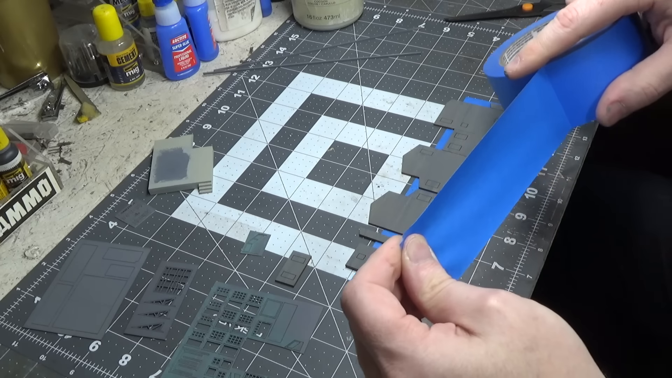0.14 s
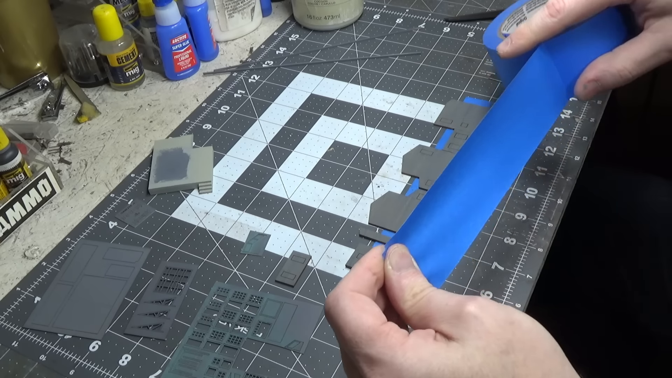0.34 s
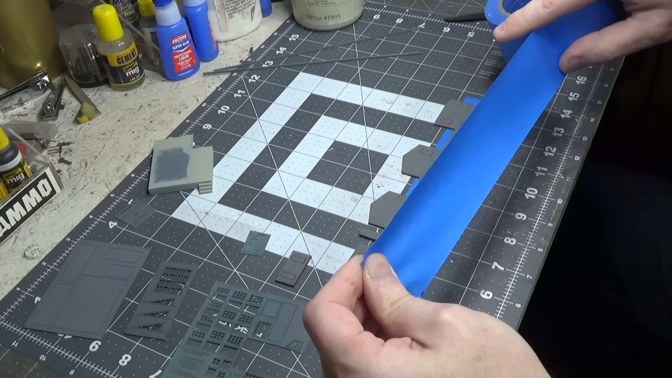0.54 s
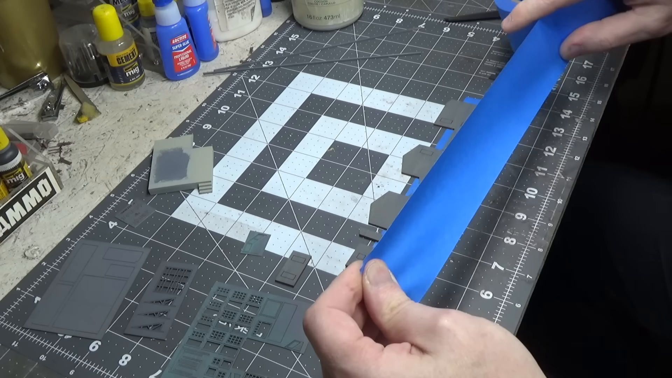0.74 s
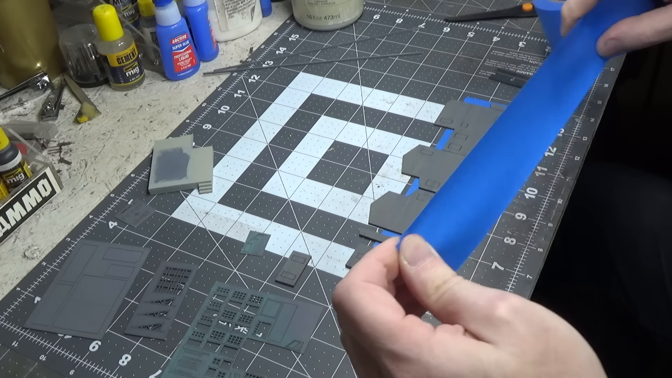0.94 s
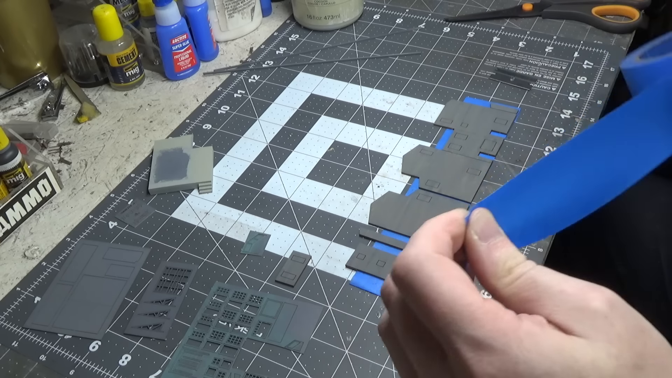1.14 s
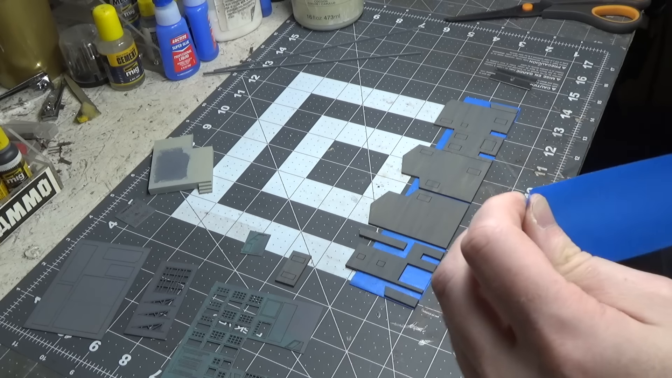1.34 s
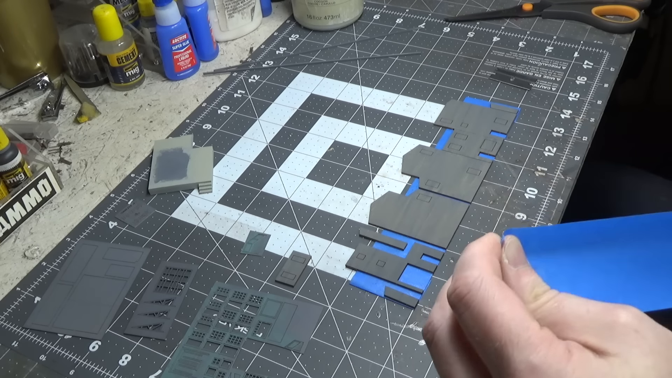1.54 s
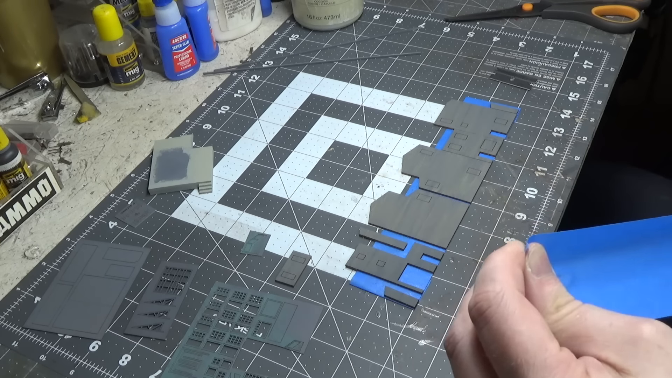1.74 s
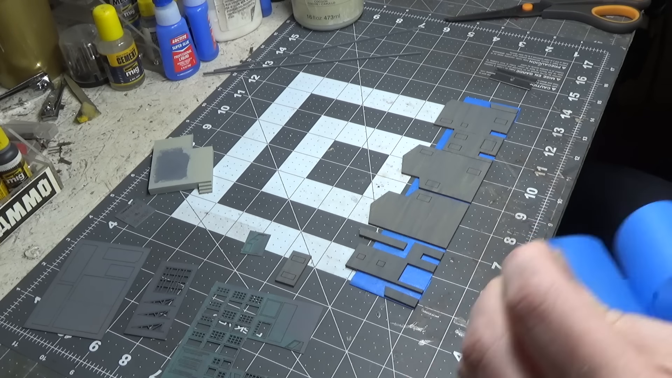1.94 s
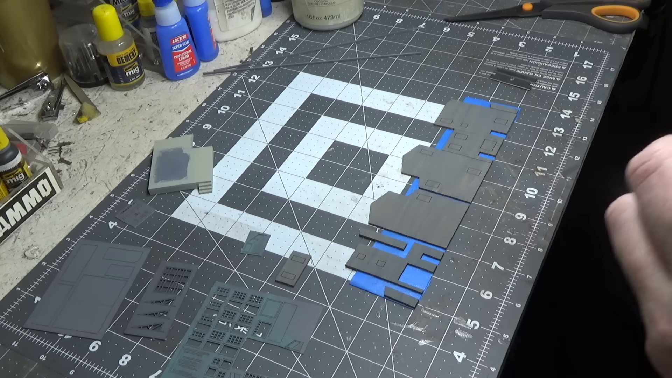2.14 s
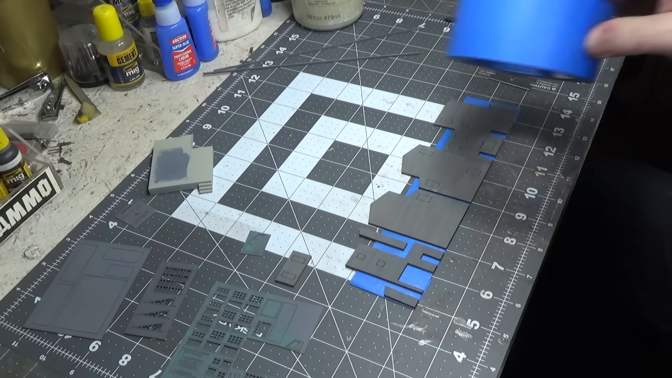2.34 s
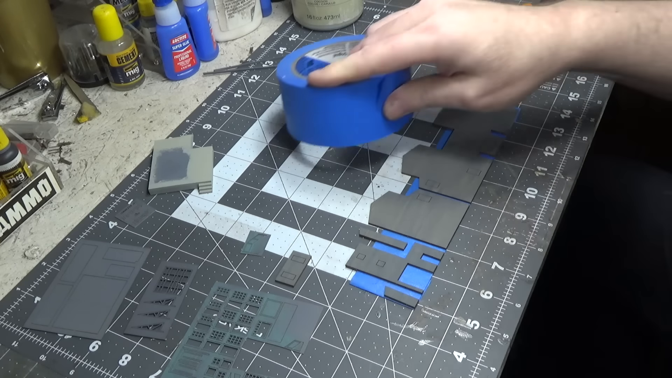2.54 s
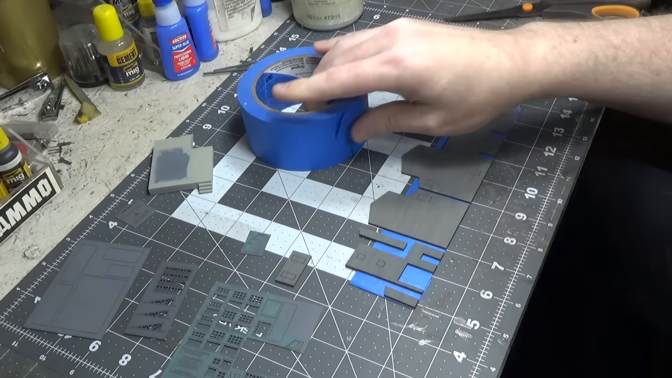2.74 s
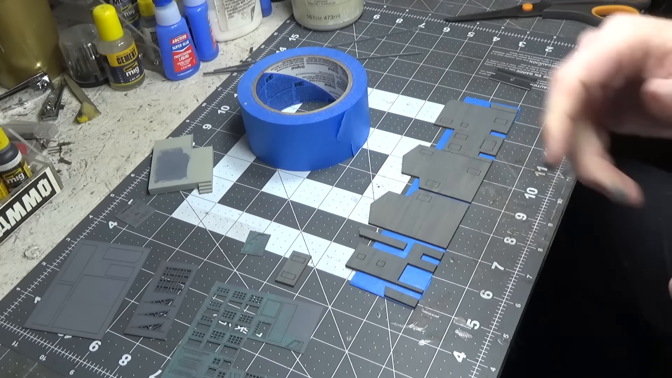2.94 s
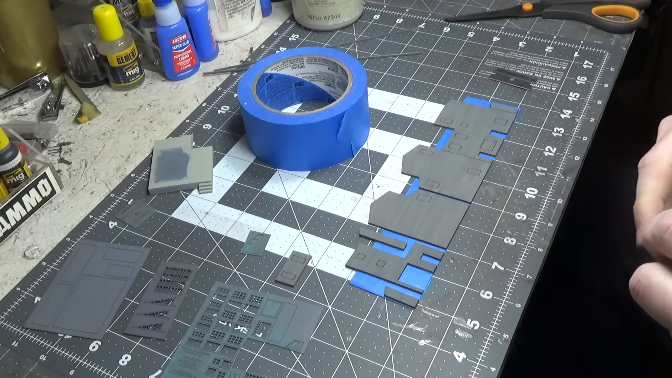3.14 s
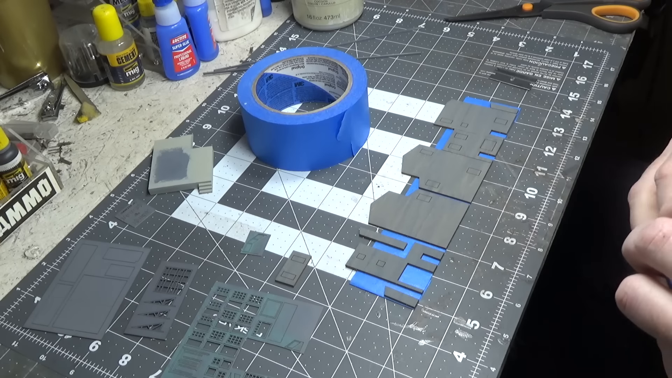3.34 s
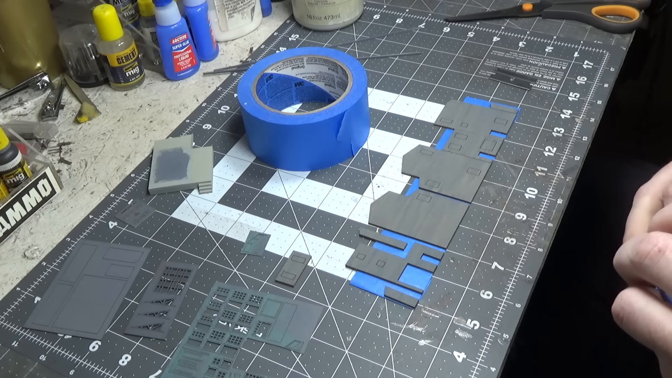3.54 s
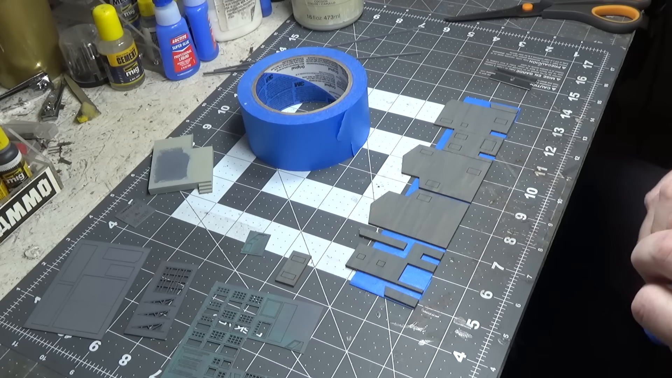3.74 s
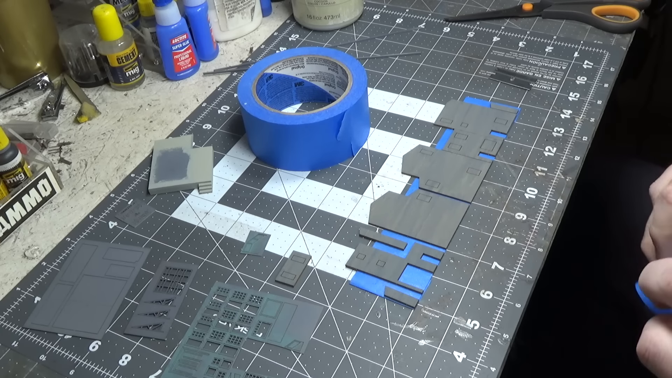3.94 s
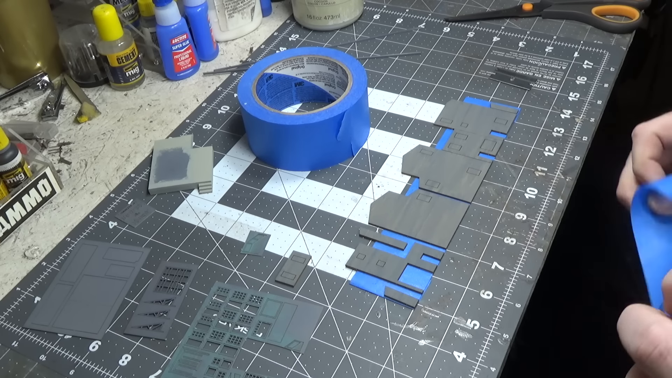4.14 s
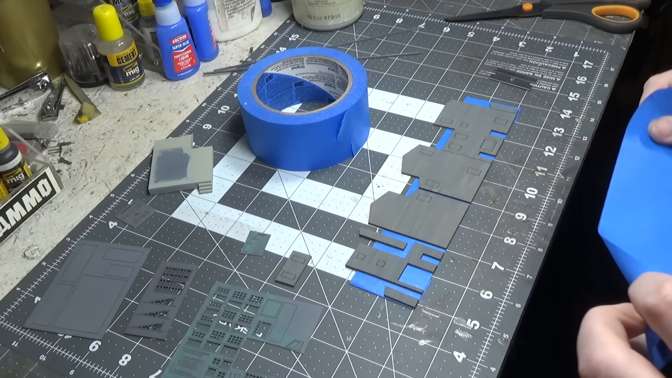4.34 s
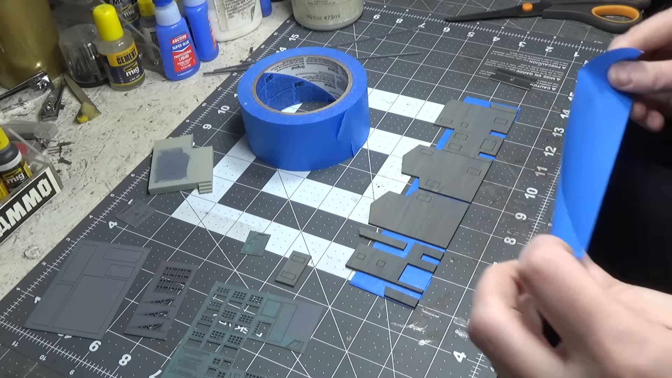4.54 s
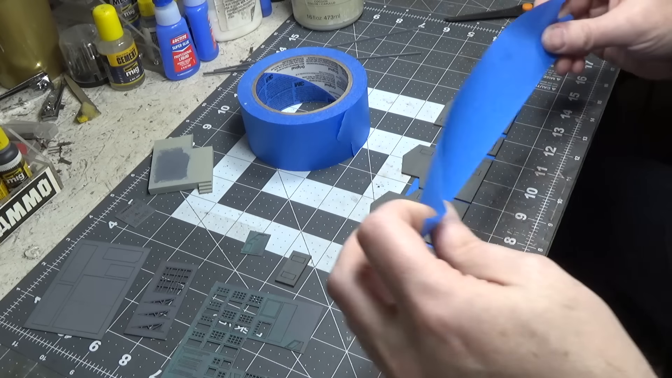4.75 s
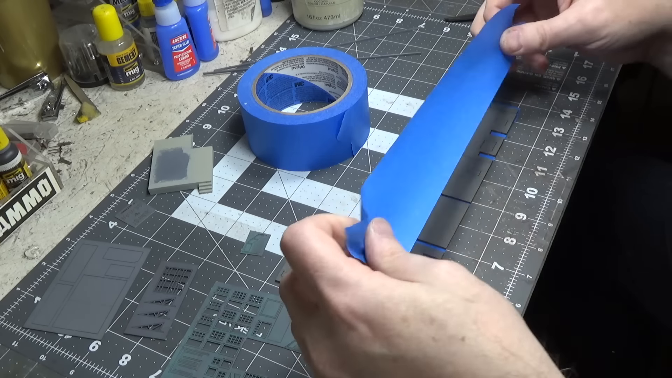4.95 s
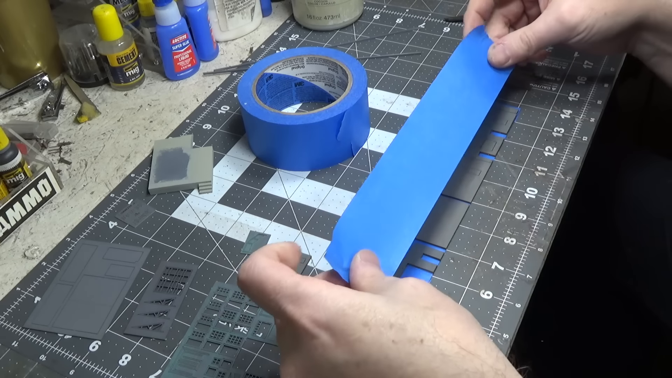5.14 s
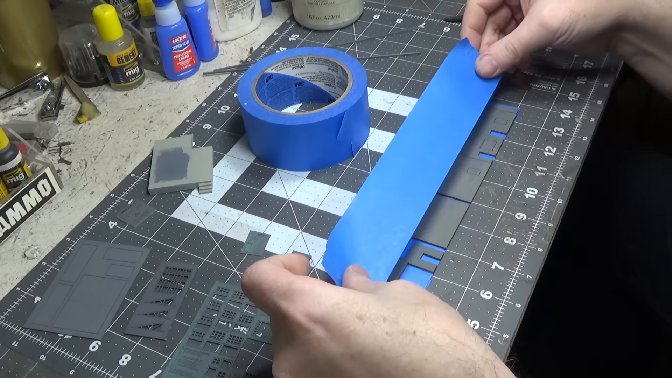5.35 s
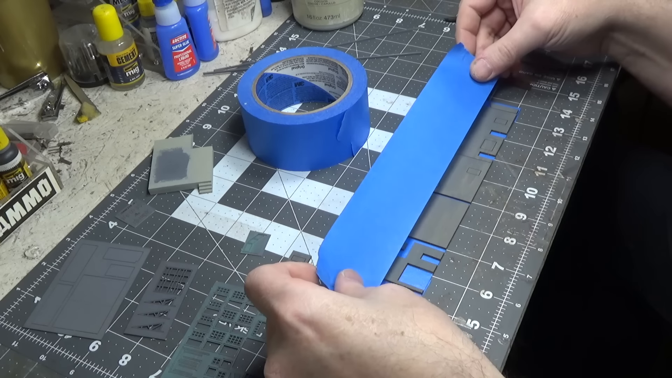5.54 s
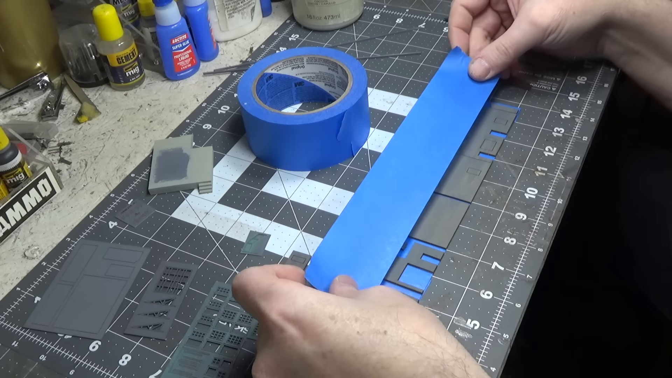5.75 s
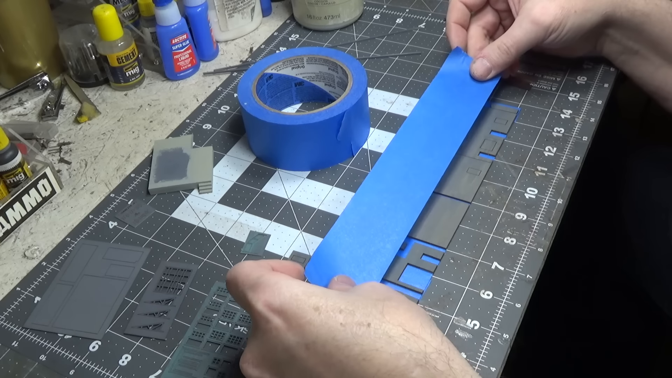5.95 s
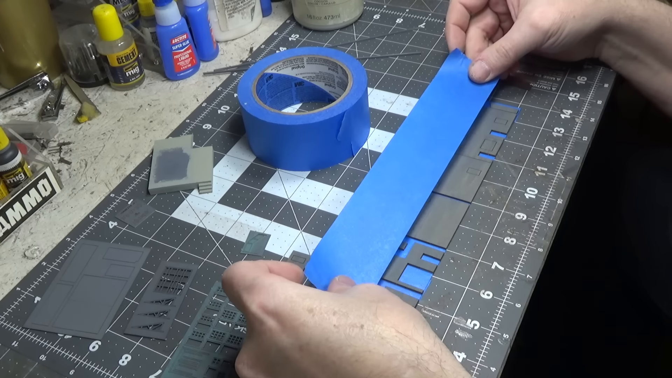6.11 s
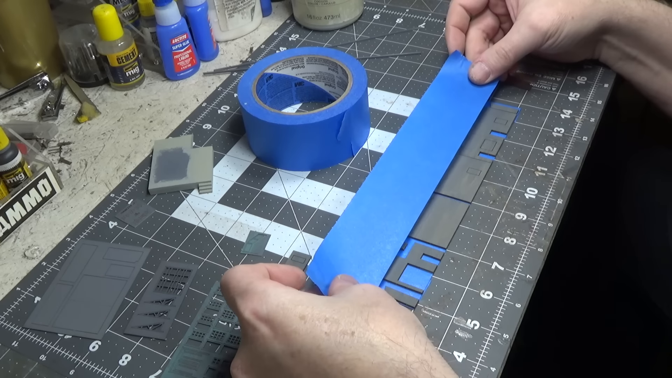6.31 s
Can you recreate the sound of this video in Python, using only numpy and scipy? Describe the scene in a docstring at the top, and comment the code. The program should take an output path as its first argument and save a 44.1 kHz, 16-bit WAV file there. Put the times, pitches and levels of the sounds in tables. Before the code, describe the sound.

Close crackling pull of masking tape, one sharp tear, a booming knock on a desk, then light papery crinkles and snaps.

```python
"""Pulling and tearing painter's tape

Tape is pulled off its roll close to a microphone: the glue crackles and the growing strip drones ever
lower. One rip, loud enough to distort, tears it off. The roll is set down on a desk, which booms and
sways. The loose strip rustles, buckles and snaps between the fingers, in a small quiet room."""
import sys
import numpy as np
from scipy import signal
from scipy.fft import rfft, irfft, next_fast_len
from scipy.io import wavfile
from scipy.ndimage import map_coordinates

SR = 44100
rng = np.random.default_rng(int(sys.argv[2]) if len(sys.argv) > 2 else 0)


def to_wav(sig):
    """Store sig (one row per channel, or 1-D mono) as 16-bit WAV at the path in sys.argv[1].

    Samples outside -1..1 are clipped; the rate is SR.
    """
    pcm = np.clip(np.atleast_2d(sig), -1, 1) * 32767
    pcm = np.round(pcm).astype(np.int16)
    wavfile.write(sys.argv[1], SR, pcm.T)  # frames by channels


N = 281269

# The pull on the tape. Each row: time in seconds, strength of the pull in dB, drone level in dB.
PULL_LEVELS = [(0, -42, -36), (.11, -40.5, -33), (.26, -45, -39.5), (.4, -43, -44), (.55, -44, -43.5),
               (.63, -45.5, -50), (.81, -50.5, -44.5), (.92, -70, -67.5)]
# The lowest note of the growing strip. Each row: time in seconds, pitch in Hz.
STRIP_PITCH = [(0, 253), (.18, 238.5), (.3, 194), (.48, 169.8), (.6, 132), (.72, 122.5), (.85, 111.6),
               (.95, 107.3)]
# The tone of glue letting go. Each row: frequency in Hz, boost or cut in dB.
CRACKLE_TONE = [(60, 3), (150, -15), (450, 7), (1300, 2.5), (2300, 3), (3000, 3), (4100, -7.5), (5500, -6),
                (9000, -17.5), (16000, -23)]
# The tone of the finest glue threads. Each row: frequency in Hz, boost or cut in dB.
FIZZ_TONE = [(1500, -25), (4000, -7), (5300, -1.5), (7000, 1), (9500, 1), (11500, -4.5), (16000, -7.5)]


def peel():
    """Glue threads snap by the thousand and shake the taut strip, whose notes sink as it grows."""
    pull_db, drone_db = curves(PULL_LEVELS)
    strip_hz, = curves(STRIP_PITCH)
    doublings = np.log2(strip_hz[0] / strip_hz)  # how often the strip has doubled in length
    judder = amp(1.3 * wobble(141.1))  # the tape sticks and lets go unevenly
    threads = unit(judder * grains(5000, spread_db=2.5))
    rasp_fade_db = 55 * np.maximum(np.log2(158.5 / strip_hz), 0)  # 55 dB an octave below 158.5 Hz
    rasp_db = pull_db + 1.5 + 0.93 * wobble(22.6) - rasp_fade_db
    # The short strip sounds dull and noisy; the long one rings like a string.
    ringing = np.interp(strip_hz, [115, 165, 230], [.85, .4, .3])
    waver = amp(2.7 * wobble(19.2))
    string_hz = strip_hz * (1 + 0.026 * wobble(32))
    string = np.sqrt(2) * waver * np.sin(2 * np.pi * np.cumsum(string_hz) / SR)
    tugs = coloured(grains(3000, spread_db=5), [(40, -12), (140, -2.5)])
    dull = gliding(tugs, strip_hz, width_hz=55)
    drone = amp(drone_db) * (np.sqrt(ringing) * string + np.sqrt(1 - ringing) * dull)
    overtone = amp(drone_db - 18) * gliding(threads, 2 * strip_hz, width_hz=120)
    rasp = amp(rasp_db) * gliding(threads, np.minimum(4.56 * strip_hz, 860), width_hz=200)
    crackle = amp(pull_db + 3.5) * unit(coloured(threads, CRACKLE_TONE))
    fine_threads = judder * grains(9000, spread_db=6)
    fizz = amp(pull_db - 8 + 9.5 * doublings) * unit(coloured(fine_threads, FIZZ_TONE))
    return (drone + overtone + rasp + crackle + fizz) * during(PULL_LEVELS[0][0], PULL_LEVELS[-1][0])


# The jerks of the rip. Each row: start in seconds, relative level in dB, bass in dB, treble in dB,
# fade time in seconds.
TEAR_JERKS = [(1.8169, -1.5, -9, -9.5, 0.0033), (1.8222, -7, -1, -5, 0.0066), (1.8306, 1, 1, -1.5, 0.0044),
              (1.8515, 5.5, -7, 0.5, .0016), (1.8647, -11, -1.5, -6, 0.002)]


def tear():
    """The tear crosses the strip in a few violent jerks, and the taut sheet rings."""
    out = np.zeros(N)
    for start, db, bass_db, treble_db, fade_s in TEAR_JERKS:
        add(out, start, amp(db + 16.5) * paper_burst(bass_db, treble_db, fade_s, ring_hz=5397))
    return out


def paper_burst(bass_db, treble_db, fade_s, ring_hz, snap=0, ring_db=-8):
    """Paper fibres crack in a dying run, with an optional first snap; the sheet shapes the tone."""
    t = np.arange(SR // 12) / SR
    age = t / fade_s
    cracks = rng.standard_normal(len(t)) * np.exp(-age) * (1 - np.exp(-age / .35))
    cracks /= np.linalg.norm(cracks)
    cracks[0] += snap * np.exp(-fade_s / 0.0011)  # only the briefest bursts go in one snap
    sheet_tone = [(30, bass_db - 23), (110, bass_db + .5), (450, bass_db + 6), (950, bass_db + 6.5),
                  (1500, bass_db / 3 + 2), (2700, 1), (4200, treble_db / 4 - 4),
                  (5600, treble_db / 2 + .5), (9000, treble_db + 1.5), (12000, treble_db - 8),
                  (16000, treble_db - 15)]
    burst = coloured(cracks, sheet_tone)
    burst += amp(ring_db) * signal.lfilter(*signal.iirpeak(ring_hz, 3.5, SR), burst)
    return burst / np.linalg.norm(burst)


# The roll lands on its rim, then flat. Each row: start in seconds, relative level in dB,
# boost or cut of the clack in dB.
ROLL_LANDINGS = [(2.639, -22.5, -7), (2.7766, -6.5, -10.5)]
# The desk top's notes. Each row: pitch in Hz, relative level in dB, seconds to fade by 60 dB.
DESK_NOTES = [(82, 2, 0.16), (139.5, -4.5, 0.19), (186.3, -9.5, 0.136), (295.5, -20, 0.13), (402, -8, .13),
              (490, -12.5, 0.12), (535, -13, 0.17), (1002, -15, 0.1), (1160, -20, .15), (1450, -27, 0.13)]
# The desk's two slow swings. Each row: frequency in Hz, relative level in dB, seconds to fade by 60 dB.
DESK_SWINGS = [(34.39, 1, 1.42), (41.17, -1.5, 2.3)]
# The tone of the cardboard core. Each row: frequency in Hz, boost or cut in dB.
CLACK_TONE = [(25, -38), (60, -7), (130, 15), (450, 7.5), (750, -3), (1300, 0.5), (1800, -2.5), (2400, 7.5),
              (3200, -4.5), (4300, -18.5), (8000, -22.5), (16000, -43)]


def roll_on_desk():
    """The cardboard core clacks, the desk top booms, and the whole desk sways on."""
    out, t = np.zeros(N), np.arange(2 * SR) / SR
    for start, db, clack_db in ROLL_LANDINGS:
        boom = sum(ring(t, *note) for note in DESK_NOTES) * (1 - np.exp(-t / 0.0011))
        fade = (amp(-60 * t / 0.018) + amp(-18 - 60 * t / 0.16)) * (1 - np.exp(-t / 0.0005))
        clack = unit(coloured(rng.standard_normal(len(t)), CLACK_TONE)) * fade
        add(out, start, amp(db - 9) * boom + amp(db + clack_db + 8) * clack)
    # The roll's full weight starts both swings, which throb against each other.
    start, db, _ = ROLL_LANDINGS[-1]
    sway = (ring(t, *DESK_SWINGS[0]) - ring(t, *DESK_SWINGS[1])) * (1 - np.exp(-t / 0.067))
    add(out, start + 0.0363, amp(db - 22.5) * sway)
    return out


# The strip buckles and snaps. Each row: time in seconds, relative level in dB, bass in dB,
# treble in dB, fade time in seconds.
CREASE_POPS = [(1.0492, -44, 6.5, -23, 0.00049), (1.1224, -40.5, -3, 2, 0.0006),
               (1.2467, -47, -16, 1.5, 0.001), (1.2596, -47, -2, -9, 0.0041),
               (1.3871, -48.5, 4.5, -21, 0.0021), (1.441, -36, -16, -12, 0.0008),
               (1.541, -45, 4.5, -16, 0.0025), (1.6194, -34, 3.5, -20, 0.0015),
               (1.642, -43.5, 8, -24, 0.00046), (1.9278, -38, -5, -34, 0.00062),
               (1.9644, -34.5, 0, -41, 0.00024), (2.0081, -33.5, -3, 2.5, 0.0016),
               (2.1532, -32, -12, -3.5, 0.0015), (2.2891, -50.5, 5, -3, 0.0017),
               (2.3284, -44.5, -2.5, -1, 0.0005), (2.35, -47, 3.5, -5.5, 0.0007),
               (3.274, -48.5, -19, -6.5, 0.0012), (3.3454, -38.5, -23, 4, 0.0013),
               (3.3568, -37, -20, -1, 0.0014), (3.462, -46.5, -14, -23, 0.002),
               (3.536, -36, -2, -30, 0.0055), (3.549, -37.5, -3, -10, 0.002),
               (3.782, -45, 5.5, -5, 0.00091), (3.8774, -45, -16, 3, 0.0015), (4.103, -30.5, -18, 2, 0.002),
               (4.1059, -28.5, -12, -3.5, 0.0031), (4.127, -33, -11.5, -15, 0.0045),
               (4.4097, -35, 1, 17, 0.0052), (4.6174, -28.5, -3.5, 7.5, 0.00055),
               (4.6621, -31.5, -4, -5.5, 0.0035), (4.812, -26.5, -13.5, -8, 0.0011),
               (4.96, -35.5, -7, -14, 0.00054), (4.976, -36.5, -1, -35, 0.0019),
               (5.0896, -32.5, -8.5, -2, 0.001), (5.1627, -36, -14, -14, 0.00046),
               (5.182, -42.5, 7, -14, 0.00044), (5.4652, -25, -21, -14.5, 0.00044)]
# Broad creases have more bass and ring lower. Each row: bass in dB, pitch in Hz.
CREASE_PITCH = [(-20, 3040), (-4.5, 2900), (7.5, 940)]


def pops():
    """Creases strain briefly, then flip over; broad ones are dull, tight ones bright."""
    out = np.zeros(N)
    for start, db, bass_db, treble_db, fade_s in CREASE_POPS:
        ring_hz = np.interp(bass_db, *np.transpose(CREASE_PITCH))
        flip = paper_burst(bass_db, treble_db, fade_s, ring_hz, snap=.7, ring_db=-2.5)
        add(out, start, amp(db + 26.5) * flip)
        strain = paper_burst(bass_db, treble_db, .003, ring_hz)[::-1]  # backwards, so the cracks build
        strain_share = min(fade_s / .001, 1)  # quick flips strain less
        add(out, start - len(strain) / SR, amp(db + 9.5) * strain_share * strain)
    return out


# Fingers slide on the paper. Each row: start and end in seconds, relative level in dB,
# boost or cut of the hiss in dB, boost or cut of the crinkle in dB.
FINGER_STROKES = [(0.968, 1.025, -56, 4.5, 8), (1.104, 1.18, -52.5, 3, -6.5), (1.438, 1.548, -57, -5.5, -6),
                  (1.788, 1.822, -46.5, -4.5, 2.5), (1.91, 2.075, -57.5, -1.5, -16),
                  (2.08, 2.162, -46.5, 3, -11), (2.194, 2.279, -51.5, 4, -12), (2.402, 2.556, -63, 5, 4.5),
                  (2.69, 2.715, -49, -17, -9), (3.192, 3.331, -52.5, -2, 11), (3.33, 3.386, -49.5, -9, -3),
                  (3.426, 3.522, -54, -8, -4), (3.532, 3.552, -39, -11, 3), (3.741, 3.811, -44.5, -1.5, 10),
                  (3.812, 4.042, -53.5, -2, 0), (4.056, 4.461, -49.5, 1.5, -18),
                  (4.092, 4.2, -50, -11, -14), (4.37, 4.455, -53, -3, -6), (4.577, 4.68, -55, 2, -19),
                  (4.731, 5.096, -53, -5, -0.5), (5.139, 5.178, -47, -16, 9),
                  (5.388, 5.459, -67, 0.5, -3.5), (5.551, 5.602, -58.5, -9, -9),
                  (5.761, 5.849, -60, -12.5, -11)]
# The strip stirs faintly while it is held. Each row: start and end in seconds.
HOLDING_TIMES = [(.965, 1.55), (1.9, 2.55), (3.19, 5.2)]
# The tones of rubbing skin, fine hiss and tiny creases. Each row: frequency in Hz, boost or cut in dB.
RUB_TONE = [(80, -11.5), (300, -10), (700, -6), (1300, -2.5), (2200, 0), (3000, 3.5), (4200, -10),
            (6000, -8), (10000, -21), (16000, -40)]
HISS_TONE = [(1500, -23.5), (4000, -7.5), (5500, -2.5), (7000, -4), (9000, 0), (11000, -12), (16000, -16.5)]
CRINKLE_TONE = [(100, -20.5), (400, -4), (1400, -5.5), (2200, 2), (3000, -10.5), (4200, -9.5), (6000, -7.5),
                (10000, -9), (16000, -20)]


def rustle():
    """Skin drags over crepe paper with a rub and a hiss; the strip crinkles where it bends."""
    rub_gain, hiss_gain, crinkle_gain = np.zeros((3, N))
    t = np.arange(SR) / SR
    for start, end, db, hiss_db, crinkle_db in FINGER_STROKES:
        length = end - start
        grip = 1 - np.exp(-t / .004)
        release_s = 0.011 + .06 * length  # long strokes also end slowly
        lift = np.exp(-np.maximum(t - length, 0) / release_s)
        stroke = amp(db - 3 * t) * grip * lift  # the finger eases off by 3 dB a second
        stroke /= np.hypot(1, amp(crinkle_db))  # crinkling takes its share of the stroke
        add(rub_gain, start, stroke)
        add(hiss_gain, start, amp(hiss_db) * stroke)
        add(crinkle_gain, start, amp(crinkle_db) * stroke)
    held = sum(during(start, end) for start, end in HOLDING_TIMES) * amp(2 * wobble(14))
    rub_gain = np.hypot(rub_gain, amp(-66) * held)
    crinkle_gain = np.hypot(crinkle_gain, amp(-63.5) * held)
    drag = amp(1.8 * wobble(45))
    rub = rub_gain * unit(coloured(drag * grains(7000, spread_db=7.5), RUB_TONE))
    hiss = amp(1.5) * hiss_gain * unit(coloured(drag * grains(11000, spread_db=5.5), HISS_TONE))
    clumps = amp(4 * np.tanh(wobble(70)))
    crinkle = amp(3) * crinkle_gain * unit(coloured(clumps * grains(550, spread_db=8), CRINKLE_TONE))
    return rub + hiss + crinkle


# The strip flaps. Each row: start in seconds, relative level in dB, speed (1 is the slack strip).
STRIP_FLAPS = [(1.831, -10.5, 1.84), (1.835, -22, 0.98), (4.123, -41.5, 0.83), (4.616, -39, 1.03),
               (4.665, -40, 1), (4.812, -36.5, 0.84), (4.846, -41, 0.78), (4.964, -34.5, 1)]
# The slack strip's swings. Each row: frequency in Hz, relative level in dB, seconds to fade by 60 dB.
SLACK_SWINGS = [(51.7, 4, 0.098), (81, -3.5, 0.31), (117, 0, 0.12), (168, -3, 0.023), (250, -4.5, 0.18)]


def flaps():
    """Each flap pushes the air in a low, short swing, higher while the strip is taut."""
    out, t = np.zeros(N), np.arange(SR // 3) / SR
    for start, db, speed in STRIP_FLAPS:
        swing = sum((-1) ** k * ring(speed * t, hz * rng.normal(1, 0.046), level, fade_s)
                    for k, (hz, level, fade_s) in enumerate(SLACK_SWINGS))
        add(out, start, amp(db - 2.5) * swing * (1 - np.exp(-t / .002)))
    return out


# How long the room rings. Each row: frequency in Hz, seconds to fade by 60 dB.
ECHO_TIMES = [(100, 0.55), (600, 0.25), (3000, 0.24), (6000, 0.2), (10000, .22), (14000, 0.11)]


def room_echo(x, desk_db, desk_fade_s, walls_db, count=48):
    """Adds echoes: the cluttered desk answers at once, the walls later; paths change as hands move."""
    hz, t, spectra = signal.stft(rng.standard_normal((count, SR // 3)), SR, nperseg=256)
    fade = amp(-60 * t / along(ECHO_TIMES, hz)[:, None])
    walls = signal.istft(spectra * fade, SR, nperseg=256)[1]
    t = np.arange(walls.shape[1]) / SR
    walls *= 1 - np.exp(-t / 0.004)
    desk = rng.standard_normal(walls.shape) * amp(-60 * t / desk_fade_s) * (t > .001)
    paths = amp(desk_db) * desk / np.linalg.norm(desk[0])
    paths += amp(walls_db) * walls / np.linalg.norm(walls[0])
    echoes, step = np.zeros(N), N // count + 1
    for k, path in enumerate(paths):  # each slice of the sound gets its own echo
        add(echoes, k * step / SR, signal.fftconvolve(x[k * step:][:step], path))
    echo_tone = [(40, -11.5), (200, -1), (1500, -2.5), (2500, -5), (3300, 3.5), (4200, 0.5),
                 (5600, 3), (7500, -7.5), (10000, -0.5), (12000, -7.5)]
    return x + coloured(echoes, echo_tone)


# The tone of the room's air. Each row: frequency in Hz, boost or cut in dB.
AIR_TONE = [(25, -8), (60, -7), (150, -11), (300, -13.5), (500, -20), (850, -21), (1300, -25),
            (2300, -28.5), (3100, -27.5), (4300, -32), (9000, -33), (16000, -36.5)]
# The notes of the hum. Each row: pitch in Hz, relative level in dB.
HUM_NOTES = [(59.2, -69.5), (290.7, -73), (360.7, -76.5), (479.1, -76), (839.8, -78.5)]


def room_tone():
    """Soft steady air with a faint hum."""
    t = np.arange(N) / SR
    hum = sum(np.sqrt(2) * amp(db + 0.67 * wobble(15)) * np.sin(2 * np.pi * (hz * t + rng.random()))
              for hz, db in HUM_NOTES)
    air = unit(coloured(rng.standard_normal(N), AIR_TONE))
    return amp(-60.5) * air + amp(-0.5) * hum


def amp(db):
    """Turn dB into a number to multiply by."""
    return 10 ** (np.asarray(db) / 20)


def unit(x):
    """Scale x to an average power of 1."""
    return x / np.sqrt(np.mean(x ** 2) + 1e-20)


def along(points, hz):
    """Read between (Hz, value) points, with octaves evenly spaced."""
    knots_hz, values = np.transpose(points)
    return np.interp(np.log(hz + 1), np.log(knots_hz + 1), values)


def curves(rows):
    """One value per sample for each column after the time."""
    times, *columns = np.transpose(rows)
    return [np.interp(np.arange(N) / SR, times, column) for column in columns]


def during(start, end):
    """1 from start to end, with short fades outside."""
    return np.interp(np.arange(N) / SR, [start - .03, start, end, end + .03], [0, 1, 1, 0])


def wobble(rate):
    """A smooth curve through `rate` random values a second."""
    return map_coordinates(rng.standard_normal(int(N * rate / SR) + 4), [np.arange(N) * rate / SR])


def coloured(x, tone):
    """Shape x with a tone given as (Hz, dB) points."""
    size = 2 * next_fast_len(len(x) // 2 + 2048)
    gains = amp(along(tone, np.fft.rfftfreq(size, 1 / SR)))
    cepstrum = irfft(np.log(gains), size)
    cepstrum[1:size // 2] *= 2  # keep one half, so nothing rings before the sound that causes it
    cepstrum[size // 2 + 1:] = 0
    return irfft(rfft(x, size) * np.exp(rfft(cepstrum)), size)[:len(x)]


def grains(rate, spread_db):
    """Tiny clicks of random size, about `rate` a second."""
    size = amp(spread_db * np.minimum(rng.standard_normal(N), 2.5))
    return unit((rng.random(N) < rate / SR) * size * rng.choice([-1, 1], N))


def ring(t, hz, db, fade_s):
    """A pure note that drops by 60 dB in fade_s seconds."""
    return amp(db - 60 * t / fade_s) * np.sin(2 * np.pi * hz * t)


def gliding(x, hz, width_hz):
    """Make x ring at a moving pitch."""
    turn = np.exp(2j * np.pi * np.cumsum(hz) / SR)
    pole = np.exp(-2 * np.pi * width_hz / SR)
    return unit(np.real(turn * signal.lfilter([1], np.poly([pole, pole]), x / turn)))


def add(track, start, x):
    """Mix x into the track at `start` seconds."""
    part = track[round(start * SR):][:len(x)]
    part += x[:len(part)]


def scene():
    """The tape and its roll in the small room, as one channel."""
    sources = peel() + rustle() + tear() + pops() + flaps() + roll_on_desk()
    in_room = room_echo(sources, desk_db=-3.5, desk_fade_s=.045, walls_db=-16)
    return (amp(-2) * in_room + room_tone())[None]


def record(dry):
    """The microphone housing rings, the loudest peaks clip, and the very lows and highs are cut."""
    housing = signal.lfilter(*signal.iirpeak(3150, 5, SR), dry)
    clipped = np.clip(dry + .5 * housing, -1, 1)
    trimmed = signal.sosfilt(signal.butter(2, 22, "high", fs=SR, output="sos"), clipped)
    size = next_fast_len(N + SR // 2)
    treble_cut = np.clip((16200 - np.fft.rfftfreq(size, 1 / SR)) / 500, 0, 1)  # steep, near 16 kHz
    return irfft(rfft(trimmed, size) * treble_cut, size)[..., :N]


dry = scene()
out = record(dry)
to_wav(out)
```